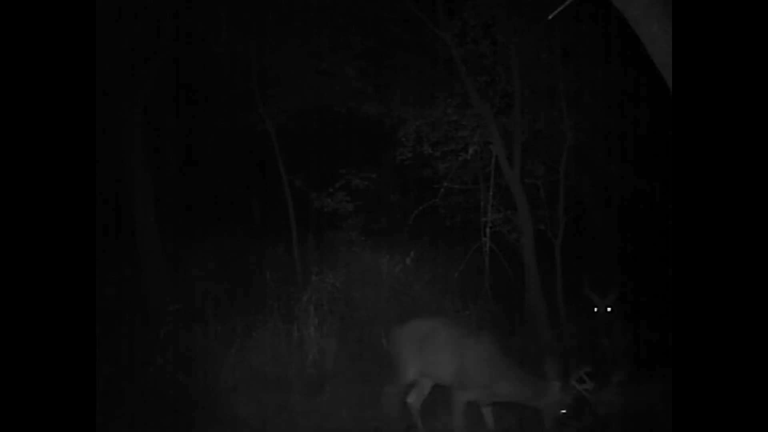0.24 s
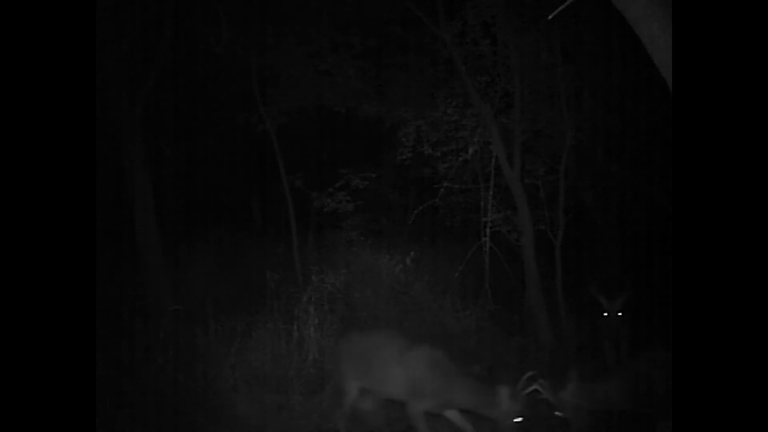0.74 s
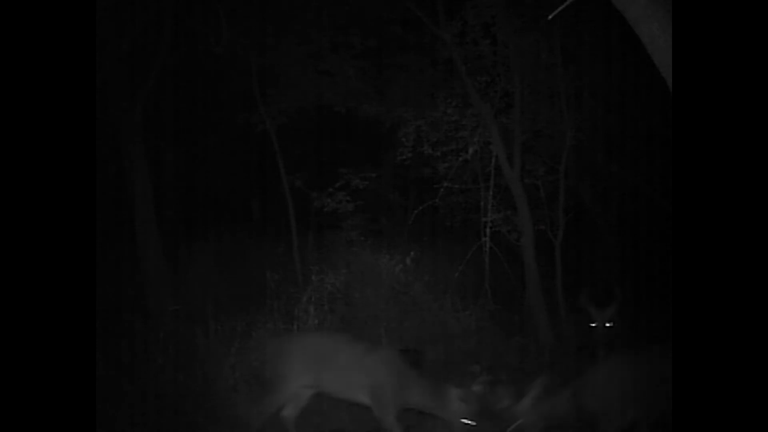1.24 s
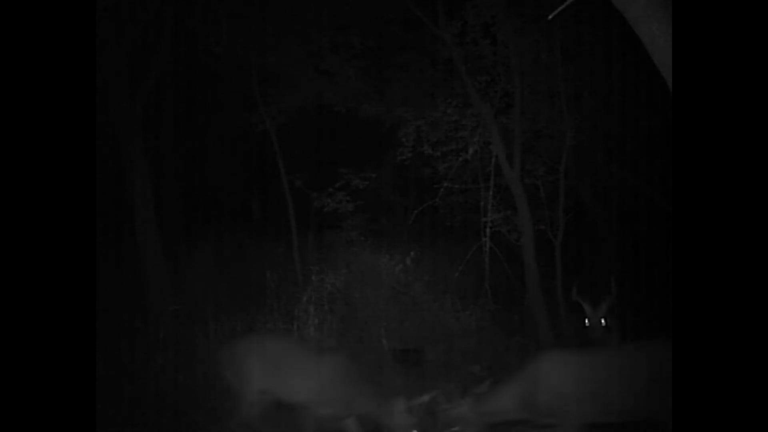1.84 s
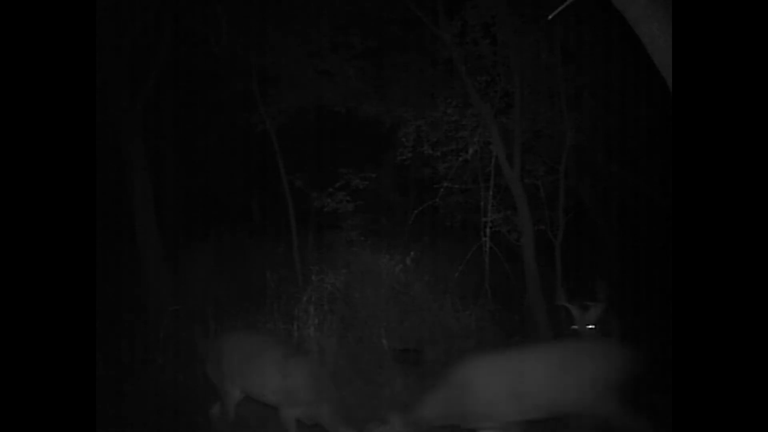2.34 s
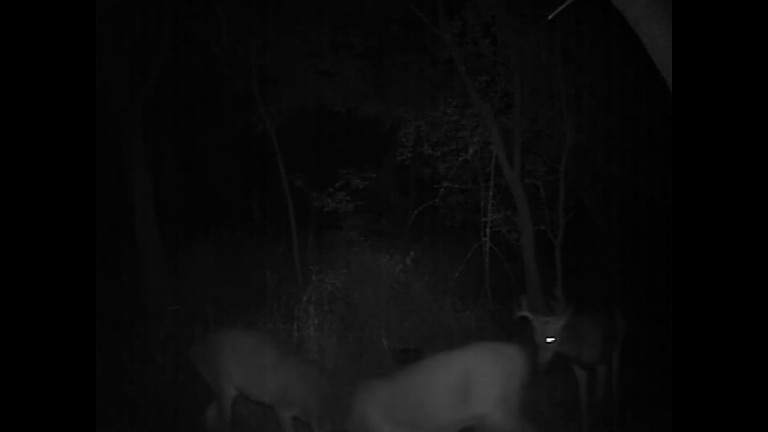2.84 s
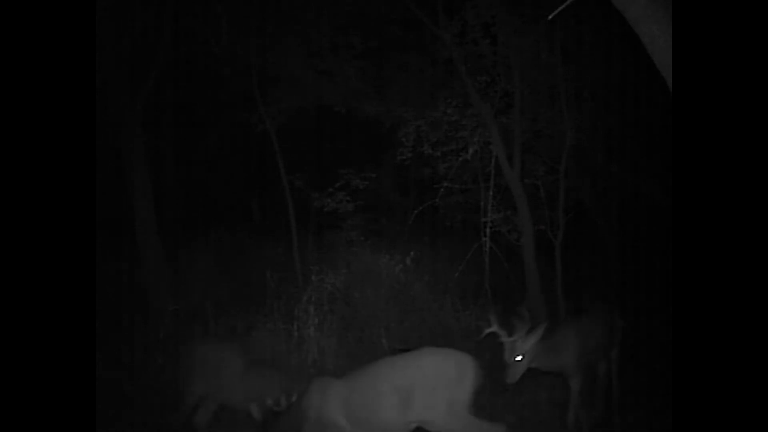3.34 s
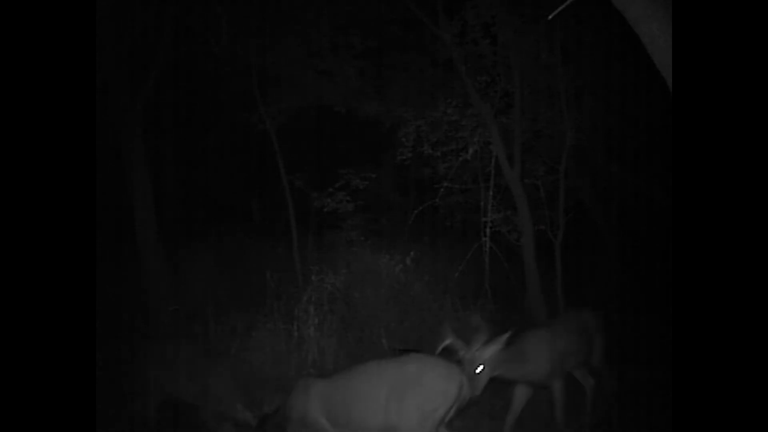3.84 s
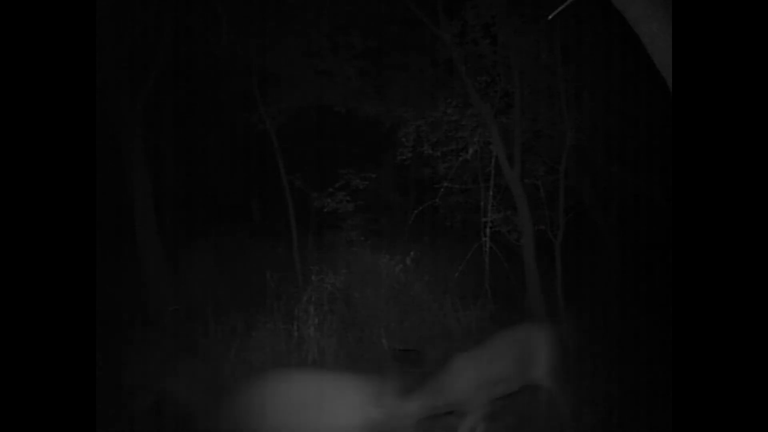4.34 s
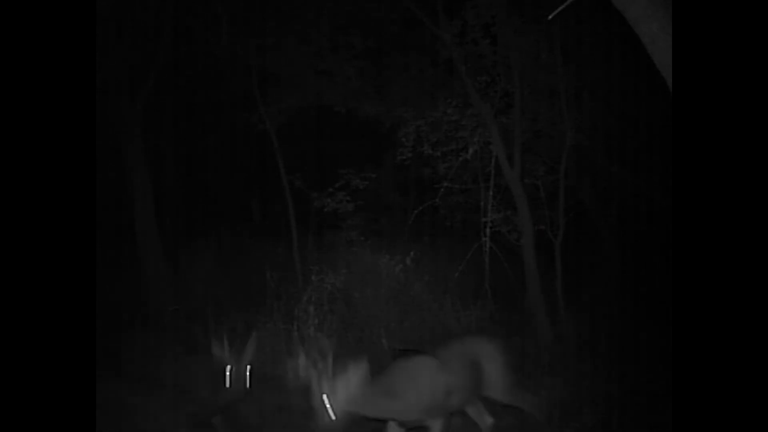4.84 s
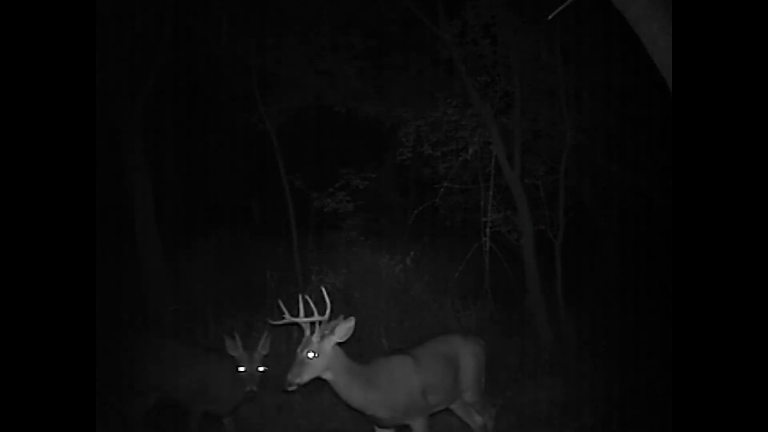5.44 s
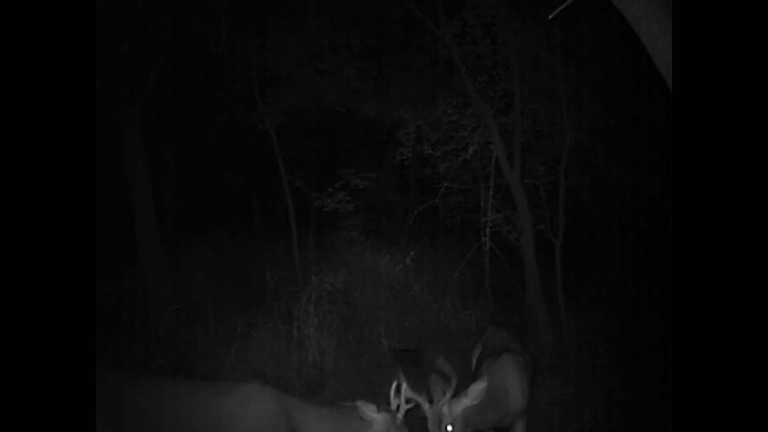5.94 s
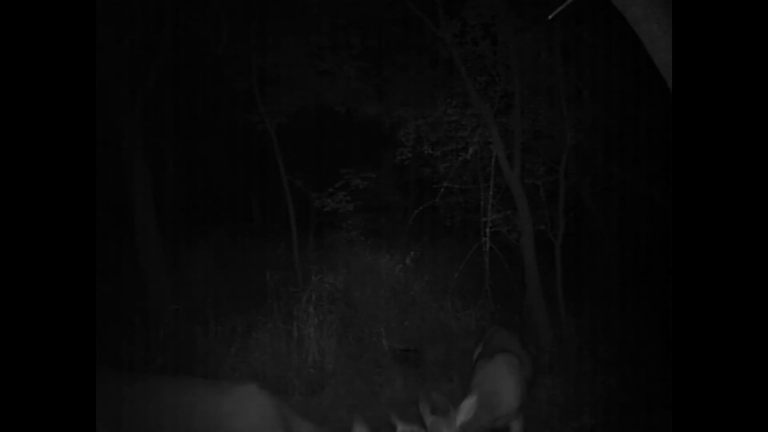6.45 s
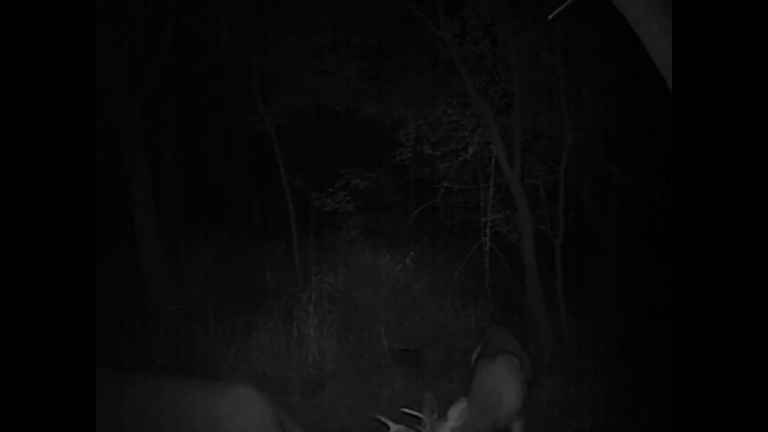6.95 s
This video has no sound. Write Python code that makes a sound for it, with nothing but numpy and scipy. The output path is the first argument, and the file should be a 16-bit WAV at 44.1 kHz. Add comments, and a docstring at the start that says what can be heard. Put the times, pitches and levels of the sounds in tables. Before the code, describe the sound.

Two bucks spar at the edge of a wood at night, their antlers meeting in light, irregular clicks. One sharp crack comes early, the taps grow busier in the middle, and the loudest crack lands late, followed by a few more knocks. Hooves shuffle softly in dry leaves, swelling before the rustle stops abruptly. A trail camera's microphone adds a slightly ringing tone and faint steady hiss and rumble.

```python
"""Antlers click and crack as two bucks spar at night at a wood's edge, in front of a trail camera.
Each blow rings tine and beam and thuds in the skull; the trees give a short tail, drier for near blows.
Hooves shuffle in dry leaves, and locked tines graze faintly between the blows.
The camera's housed microphone rings near 3 kHz and lays rumble and hiss under everything.
The sound drops out for a moment near the start, and the rustle cuts off abruptly at 5.79 s."""
import sys
import numpy as np
from scipy import signal
from scipy.fft import rfft, irfft
from scipy.io import wavfile
from scipy.ndimage import uniform_filter1d

SR = 44100
rng = np.random.default_rng(int(sys.argv[2]) if len(sys.argv) > 2 else 0)


def generate_wav(signal):
    """Clip the signal to [-1, 1] and save it as 16-bit WAV at the path in sys.argv[1]."""
    frames = np.transpose(np.atleast_2d(signal))
    scaled = np.clip(frames, -1, 1) * 32767
    pcm = np.round(scaled).astype(np.int16)
    wavfile.write(sys.argv[1], SR, pcm)


N = 317991
TIME = np.arange(N) / SR
HOUSING_HZ = 3100   # ring of the microphone's housing
ATTACK_S = .0035   # the opening of a touch, which sets its level

# spectrum of the noisy snap of tine on tine: f/Hz, level/dB
SNAP_SPECTRUM = [(200, -22.5), (500, -20.5), (1000, 0.5), (1600, -15), (2300, -15.5), (3050, 1.5),
                 (3700, -10), (4500, -24.5), (6500, -14), (7800, -20), (9200, -16), (11300, -11),
                 (13000, -31.5), (16000, -35.5)]
# bands of the knock, lower shoulder, clack, upper shoulder and crack: low f/Hz, high f/Hz
REGISTERS = [(200, 1500), (1600, 2500), (2500, 3900), (3900, 5300), (5600, 15500)]


def from_db(db):
    return 10 ** (np.asarray(db) / 20)


def rms(x):
    return np.sqrt(np.mean(x ** 2) + 1e-24)


def at_hz(points, hz):
    """Read a curve on a log-frequency axis."""
    points = np.array(points)
    return np.interp(np.log(hz + 1), np.log(points[:, 0]), points[:, 1])


def band(x, low_hz, high_hz, order=5):
    """Causal band-pass."""
    sos = signal.butter(order, [low_hz, min(high_hz, .45 * SR)], "band", fs=SR, output="sos")
    return signal.sosfilt(sos, x)


def colour(x, spectrum, size=8192):
    """Minimum-phase filter with the given spectrum."""
    gain = from_db(at_hz(spectrum, np.fft.rfftfreq(size, 1 / SR)))
    cepstrum = irfft(np.log(gain))
    cepstrum[1:size // 2] *= 2
    cepstrum[size // 2 + 1:] = 0
    return signal.fftconvolve(x, irfft(np.exp(rfft(cepstrum))))[:len(x)]


def drift(knots_per_s):
    """A random wander between knots of spread 1."""
    knots = rng.standard_normal(int(N / SR * knots_per_s) + 2)
    return np.interp(TIME * knots_per_s, np.arange(len(knots)), knots)


def add(out, start_s, sound):
    """Mix a sound in at a given time."""
    start = int(start_s * SR)
    out[start:start + len(sound)] += sound[:max(N - start, 0)]


def rise_and_decay(t, rise_s, t60):
    """Envelope that builds quickly and falls 60 dB in t60 seconds."""
    return (1 - np.exp(-t / rise_s)) * np.exp(-np.log(1000) * t / t60)


def mode(hz, t60, skid_s, size=3000):
    """A damped sine that builds while the tines skid."""
    t = np.arange(size) / SR
    return np.sin(2 * np.pi * hz * t) * rise_and_decay(t, skid_s, t60)


def camera_noise(level_db=-56):
    """Steady rumble and hiss of the microphone's amplifier."""
    # spectrum of the amplifier's noise: f/Hz, level/dB
    noise_spectrum = [(15, 8.5), (40, -1), (100, -6.5), (200, -14), (400, -20.5), (800, -25.5),
                      (1500, -29.5), (2500, -30.5), (4100, -28.5), (4700, -34.5), (8000, -37.5),
                      (12000, -40.5), (16000, -41)]
    noise = band(colour(rng.standard_normal(N), noise_spectrum), 10.22, 19260, order=2)
    return from_db(level_db) * noise / rms(noise)


def rustle_db(times_s):
    """Level of the leaf rustle, swelling with the shoving; the sound cuts off abruptly at 5.79 s."""
    # running rustle of the leaves underfoot: t/s, level/dB
    rustle_levels = [(0, -75), (0.75, -74), (2.6, -75.5), (4.35, -71.5), (4.72, -62.5), (4.87, -55),
                     (5.12, -54), (5.3, -60), (5.45, -54.5), (5.63, -55.5), (5.73, -68.5), (5.785, -63),
                     (5.8, -90), (7.2, -88)]
    return np.interp(times_s, *np.transpose(rustle_levels))


def leaf_gains(fade_db=24, rise_share=0.637, rustle_crisp_db=-4.5):
    """Gains of the leaves' swish and crisp treble: the running rustle plus short swells."""
    # leafy swells, mostly hoof steps; at 1.26 s, the bright tail of the loud antler crack:
    # peak t/s, swish level/dB, time to fall by fade_db/s, treble re swish/dB
    swells = [(0.17, -67.5, 0.31, -11.5), (0.38, -62, 0.277, -8), (0.53, -62.5, 0.184, -3.5),
              (0.62, -58.5, 0.086, -3), (0.98, -68, 0.106, -3.5), (1.17, -62, 0.079, -15.5),
              (1.26, -49.5, 0.1305, -0.5), (1.4, -59.5, 0.16, -6.5), (1.821, -63.5, 0.399, -5.5),
              (2.43, -69.5, 0.145, -7.5), (2.9, -62, 0.133, -12.5), (3.11, -67, 0.083, -0.5),
              (3.35, -59, 0.053, -7.5), (3.82, -71.5, 0.11, 2), (3.95, -58.5, 0.175, -6),
              (4.25, -67.5, 0.39, -8), (4.52, -58, 0.1926, -5), (4.96, -57.5, 0.083, -9.5),
              (5.1, -46.5, 0.144, -9.5), (5.64, -53.5, 0.065, -4.5), (6.43, -66, 0.145, -19)]
    swish_power = from_db(rustle_db(TIME)) ** 2
    crisp_power = swish_power * from_db(rustle_crisp_db) ** 2
    for peak_s, swell_db, fall_s, crisp_db in swells:
        from_peak = np.maximum((peak_s - TIME) / rise_share, TIME - peak_s) / fall_s
        swell_power = from_db(swell_db - fade_db * np.minimum(from_peak, 10)) ** 2
        swish_power += swell_power
        crisp_power += swell_power * from_db(crisp_db) ** 2
    return np.sqrt(swish_power), np.sqrt(crisp_power)


def leaves(snaps_per_s=7000, size_spread_db=2.5, clump_db=2.5, sway_db=0.4):
    """Dry leaves break under the hooves in thousands of tiny snaps that come in clumps."""
    # spectrum of the dry leaves: f/Hz, level/dB
    leaf_spectrum = [(250, -11), (700, -16), (1500, -16), (2200, -6), (3050, 4), (3850, -3.5), (5100, -18),
                     (6600, -16), (7750, -24), (8900, -12.5), (10000, -16), (11400, -12.5), (13000, -23.5),
                     (16000, -29)]
    swish_gain, crisp_gain = leaf_gains()
    sizes = from_db(size_spread_db * np.minimum(rng.exponential(1, N), 5)) * rng.choice([-1, 1], N)
    breaks = rng.random(N) < snaps_per_s / SR
    clumps = from_db(clump_db * drift(70) + sway_db * drift(14))
    rustle = colour(sizes * breaks * clumps, leaf_spectrum)
    swish, crisp = band(rustle, 150, 5200), band(rustle, 5200, 18000)
    return swish_gain * swish / rms(swish) + crisp_gain * crisp / rms(crisp)


def register_levels(clack_db, knock_db, crack_db, tilt):
    """Levels of the five bands: a blunt touch fills the shoulder below the clack, a hard one that above."""
    lower_db = -7 + 0.46 * knock_db - 0.12 * tilt
    upper_db = -8 + 0.41 * crack_db
    return clack_db + np.array([knock_db - 4, lower_db, 0, upper_db, crack_db])


def antler_ring(levels_db, tilt, detune=0.019, spread_db=4.0, snap_s=0.000893,
                bounce_s=0.0015, bounce_db=-11, size=3000):
    """A short skid rings the antler's modes and gives off a snap; tilt is in dB/octave near the clack."""
    # antler modes as heard through the housing: f/Hz, level/dB, t60/s
    antler_modes = [(791, -6, 0.00932), (928.8, -4.5, 0.0204), (1150, -11, 0.033), (1346, -1, 0.017),
                    (1956, -6, 0.027), (2294, 8, 0.0171), (2705, -2.5, 0.019), (2947.6, 5, 0.018),
                    (3158, 12.5, 0.0077), (3517, -2.5, 0.013), (3940, -6.5, 0.023), (4224, -8, 0.011),
                    (4785, -6, 0.0054), (6240, -19, .008), (6945, 4, 0.0093), (8812, -0.5, 0.02),
                    (9410, 2.5, 0.015), (10560, -2, 0.0042), (11826, -10, 0.025), (12020, -5, 0.0097)]
    hz, mode_db, t60 = np.transpose(antler_modes)
    t = np.arange(size) / SR
    # every touch lands on another spot, so the modes differ in pitch and strength
    pitch = hz * (1 + detune * rng.standard_normal(len(hz)))
    octaves = np.clip(np.log2(hz / HOUSING_HZ), -.4, .4)
    strength = from_db(mode_db + tilt * octaves + spread_db * rng.standard_normal(len(hz)))
    modes = strength[:, None] * mode(pitch[:, None], t60[:, None], skid_s=0.00048, size=size)
    snap = colour(rng.standard_normal(size) * np.exp(-t / snap_s), SNAP_SPECTRUM)
    lag = int(bounce_s * SR * rng.uniform(.5, 1.5))
    attack = t < ATTACK_S
    snap_re_ring_db = [-3, -3, -3, -3, 4]
    out = np.zeros(size)
    for (low, high), level_db, snap_db in zip(REGISTERS, levels_db, snap_re_ring_db):
        ring = band(modes[(hz >= low) & (hz < high)].sum(axis=0), low, high, order=3)
        noise = band(snap, low, high, order=3)
        part = ring / rms(ring[attack]) + from_db(snap_db) * noise / rms(noise[attack])
        part = part + from_db(bounce_db) * np.pad(part, (lag, 0))[:size]   # bounce off the ground
        out += from_db(level_db) * part / rms(part[attack])
    return out


def tine(clack_db, hz, share_db=6.5):
    """The struck tine rings briefly at a pitch of its own."""
    return from_db(clack_db + share_db) * np.sqrt(2) * mode(hz, t60=0.011, skid_s=0.001077)


def beam(knock_db, hz, share_db=-2):
    """The struck beam bends in one hollow mode, whose pitch depends on where it is hit."""
    return from_db(knock_db + share_db) * np.sqrt(2) * mode(hz, t60=0.0593, skid_s=0.000438)


def skull(clack_db, share_db=-39, decay_s=0.0029, size=3000):
    """The head behind the antler takes the blow with a short, dull thud."""
    t = np.arange(size) / SR
    thud = band(rng.standard_normal(size) * np.exp(-t / decay_s), 220, 520, order=2)
    return from_db(clack_db + share_db) * thud / rms(thud[t < decay_s])


def tree_tail(levels_db, build_s=0.0013, size=18000):
    """Trunks and brush scatter a clack back to the microphone as a smooth, short tail."""
    # decay among the trees: f/Hz, t60/s
    decay_times = [(500, .28), (3000, 0.304), (11000, 0.2)]
    brightening_db = [-3, -1.5, 0, 4, 4]
    t = np.arange(size) / SR
    scatter = colour(rng.standard_normal(size), SNAP_SPECTRUM)
    out = np.zeros(size)
    for (low, high), level_db in zip(REGISTERS, levels_db + brightening_db):
        t60 = at_hz(decay_times, np.sqrt(low * high))
        tail = band(scatter, low, high, order=3) * rise_and_decay(t, build_s, t60)
        out += from_db(level_db) * tail * np.sqrt(ATTACK_S * SR / np.sum(tail ** 2))
    return out


def blow(clack_db, clack_hz, knock_db, knock_hz, crack_db, middling_db=-35.5):
    """One meeting of tines: clack, hollow knock, thud of the skull and the tail among the trees."""
    tilt = 92.5 * np.log2(clack_hz / HOUSING_HZ)   # a higher tine favours the higher modes
    levels_db = register_levels(clack_db, knock_db, crack_db, tilt)
    tail_db = -11 - 0.265 * (clack_db - middling_db)   # louder clacks are nearer, so drier
    out = tree_tail(levels_db + tail_db)
    ring = antler_ring(levels_db + [0, 0, -4, 0, 0], tilt)   # leaves room for the tine's own clack
    add(out, 0, ring + tine(clack_db, clack_hz) + beam(clack_db + knock_db, knock_hz) + skull(clack_db))
    return out


def antlers():
    """The blows; where the racks meet at two points, a second lands softer, duller and lower."""
    # tine strikes tine: t/s, clack level/dB, clack f/Hz, knock re clack/dB, knock f/Hz,
    # crack re clack/dB, delay of a second touch/s (none up to 2 ms)
    blows = [(0.5489, -42.5, 3310, -17.5, 1008, -16, 0.0055), (0.9307, -42, 2862, -23.5, 1904, -8.5, 0),
             (1.2273, -21.5, 3156, -25, 1343, -4.5, 0.01), (1.3437, -44.5, 3000, -21, 1970, -11, 0.0075),
             (1.997, -51.5, 2950, -16, 1915, -11.5, 0.00039), (2.003, -46.5, 3030, -18, 1900, -10.5, .004),
             (2.256, -46.5, 3265, -16.5, 1303, -9, 0), (2.6154, -59, 2900, -16, 730, -19.5, 0),
             (2.7253, -46, 2930, -11, 1208, -21.5, 0), (2.878, -54, 3000, -18.5, 790, -13, 0.0041),
             (3.076, -53, 3020, -3.5, 983, -32.5, 0), (3.136, -57, 2750, -12, 1110, -17, 0.0054),
             (3.5438, -41.5, 2957, -17.5, 1830, -24.5, 0.0042),
             (3.7143, -43, 3059, -13.5, 1831, -15.5, 0.0048), (3.769, -53, 2790, -15, 1770, -13, 0.0035),
             (3.9119, -40.5, 2827, -23, 1860, -8, 0.0017), (4.117, -44, 3250, -15, 1758, -21, 0.0024),
             (4.2218, -52.5, 3050, -8, 961, -14, 0.0021), (4.3451, -42.5, 3030, -11, 800.1, -25.5, 0.0051),
             (4.3487, -32, 3087, -21.5, 1118, -23, 0.0058),
             (4.4233, -50.5, 2950, -9.5, 769.6, -28.5, 0.0019),
             (4.6702, -41.5, 2887, -14, 768.7, -18, 0.00017),
             (4.6762, -32, 3000, -28, 901.2, -13.5, 0.0058), (4.8254, -44.5, 3050, -16, 1762, -10, 0.01),
             (4.8894, -44, 2754, -13.5, 696, -16.5, 0.0075), (5.4014, -45, 2900, -14, 1121, -16.5, 0.0043),
             (5.4802, -15, 3445, -22.5, 1381, -12.5, 0.00475), (5.517, -27, 3375, -26, 1716, -24, 0),
             (5.5487, -40.5, 2633, -13.5, 1908, -22.5, 0.0024),
             (5.57, -44, 3200, -17.5, 1856, -22.5, 0.000083), (5.8604, -53, 2920, -18.5, 784, -26, 0),
             (6.0488, -36.5, 3347, -18.5, 950, -26, 0), (6.3342, -53.5, 3140, -10, 1381, -28.5, 0),
             (6.4006, -47.5, 3140, -16, 930, -23, 0.00046), (6.4668, -28, 2777, -27.5, 1480, -32, 0.00028),
             (6.491, -40.5, 2720, -21.5, 1520, -27.5, 0), (6.9326, -59, 3200, -13, 910, -13, 0),
             (7.2053, -53, 3050, -15, 1950, -21, 1)]
    out = np.zeros(N)
    for start_s, clack_db, clack_hz, knock_db, knock_hz, crack_db, delay_s in blows:
        add(out, start_s, blow(clack_db, clack_hz, knock_db, knock_hz, crack_db))
        if delay_s > .002:
            second = blow(clack_db - 3.5, clack_hz * 0.956, knock_db, knock_hz, crack_db - 8.5)
            add(out, start_s + delay_s, second)
    return out


def grazes(grazes_per_s=4, above_rustle_db=4.5, spread_db=2, tilt=2.4):
    """Locked tines tick faintly at random, following the level of the leaf rustle."""
    out = np.zeros(N)
    for start_s in TIME[rng.random(N) < grazes_per_s / SR]:
        clack_db = rustle_db(start_s) + above_rustle_db + spread_db * rng.standard_normal()
        levels_db = register_levels(clack_db, knock_db=-15, crack_db=-13.5, tilt=tilt)
        add(out, start_s, antler_ring(levels_db, tilt))
    return out


def scene():
    """Antlers and hooves over the camera's noise, at its one microphone."""
    return (camera_noise() + antlers() + leaves() + grazes())[None, :]


def record(dry):
    """The sound drops out for a moment near the start; the top is cut steeply."""
    drop_s, return_s, cutoff_hz = .229, .272, 15750
    live = (TIME < drop_s) | (TIME > return_s)
    gain = np.maximum(uniform_filter1d(live.astype(float), size=200), 1e-3)
    low_pass = signal.ellip(10, .1, 80, cutoff_hz, fs=SR, output="sos")
    return signal.sosfilt(low_pass, dry * gain)


dry = scene()
out = record(dry)
generate_wav(out)
```